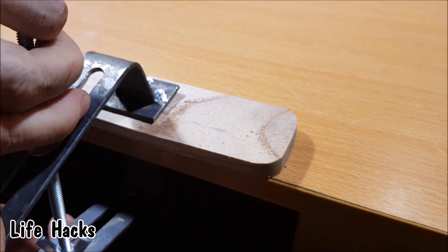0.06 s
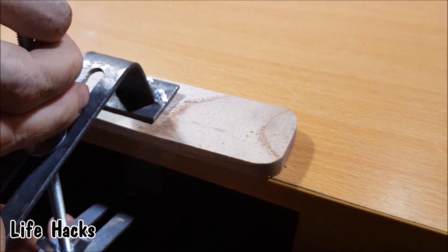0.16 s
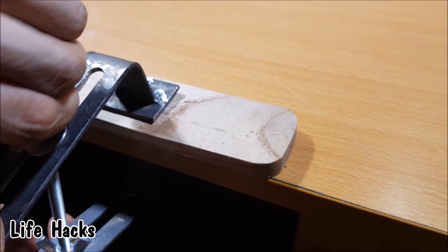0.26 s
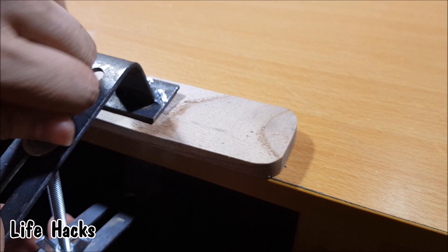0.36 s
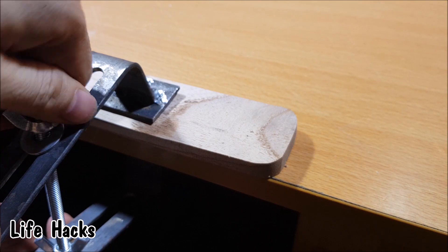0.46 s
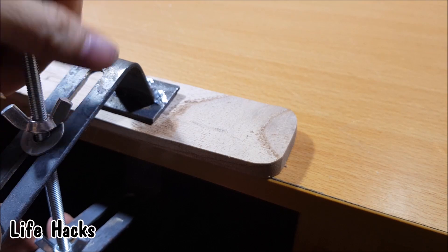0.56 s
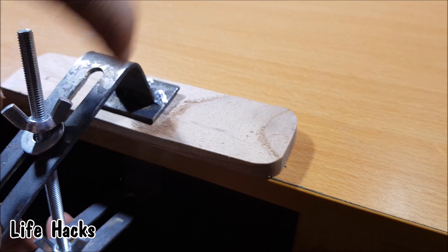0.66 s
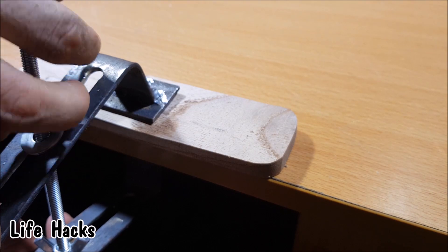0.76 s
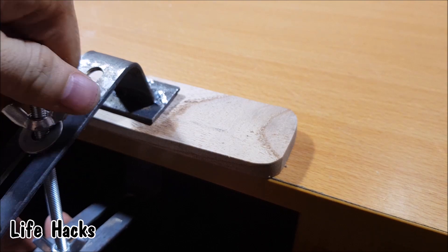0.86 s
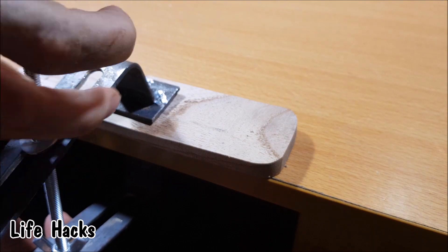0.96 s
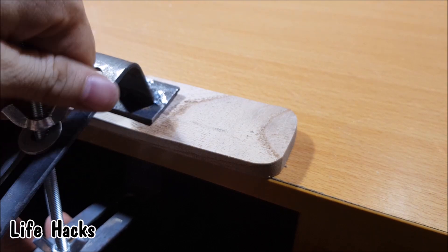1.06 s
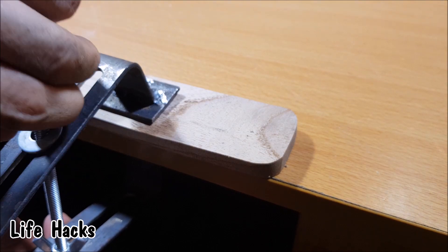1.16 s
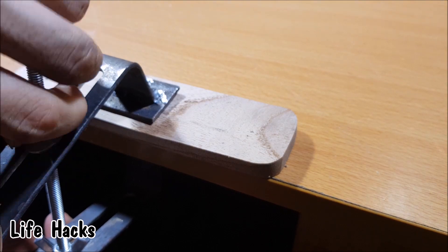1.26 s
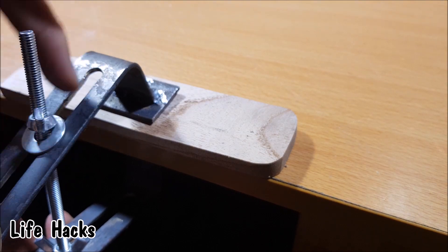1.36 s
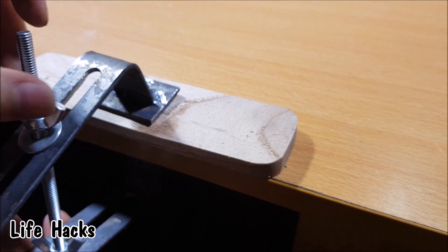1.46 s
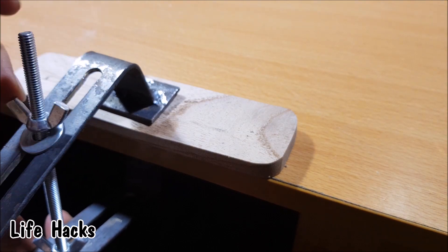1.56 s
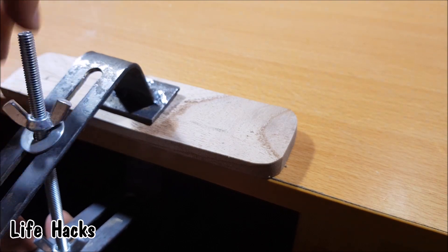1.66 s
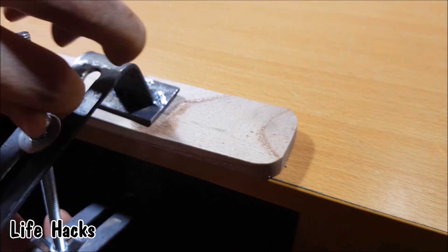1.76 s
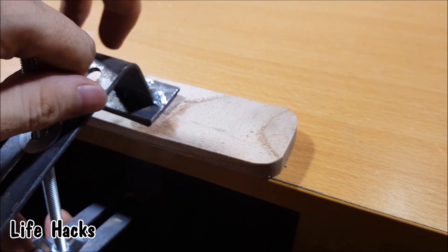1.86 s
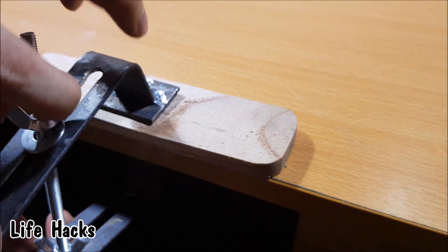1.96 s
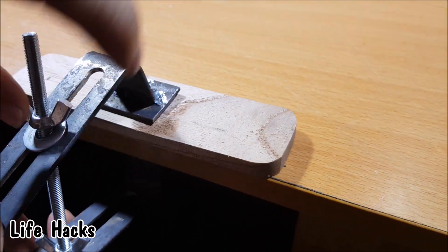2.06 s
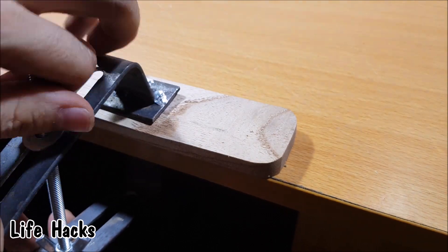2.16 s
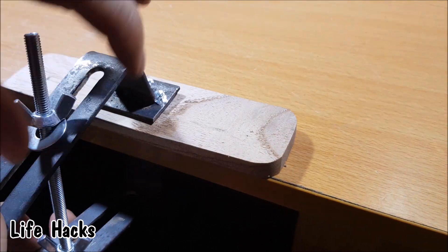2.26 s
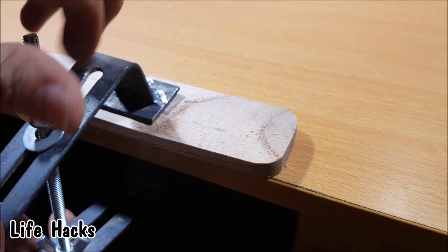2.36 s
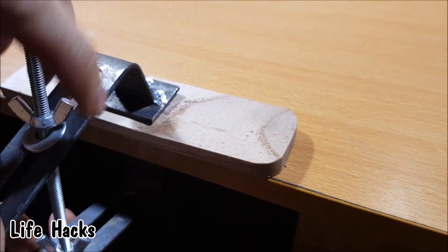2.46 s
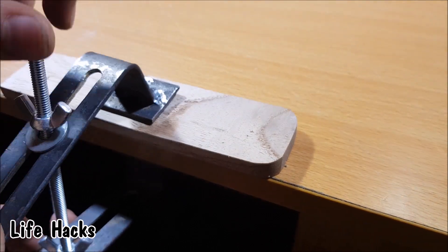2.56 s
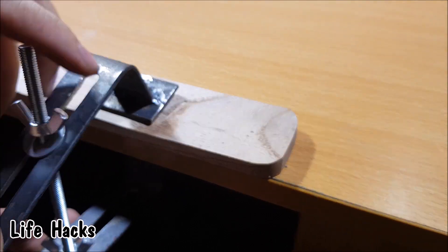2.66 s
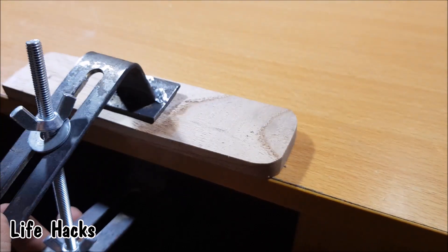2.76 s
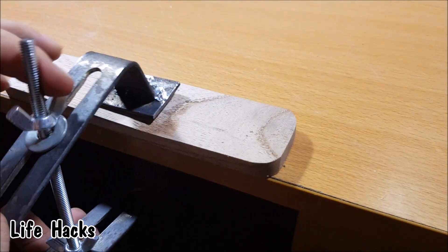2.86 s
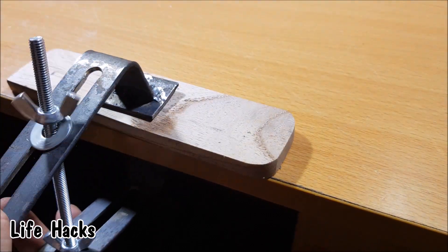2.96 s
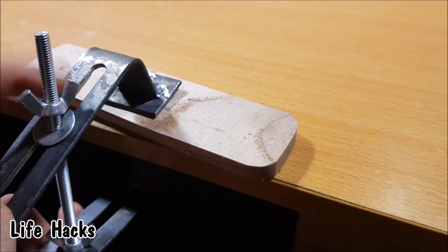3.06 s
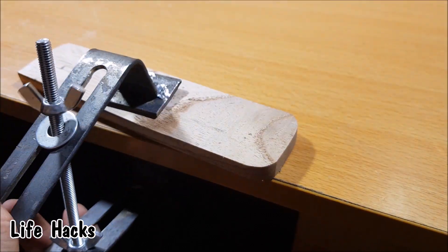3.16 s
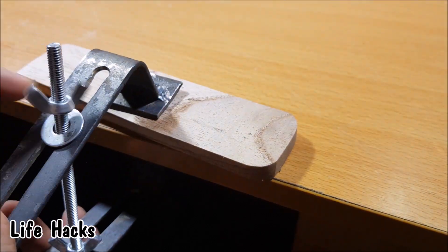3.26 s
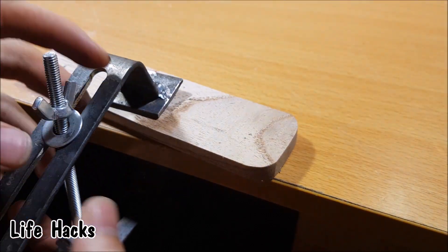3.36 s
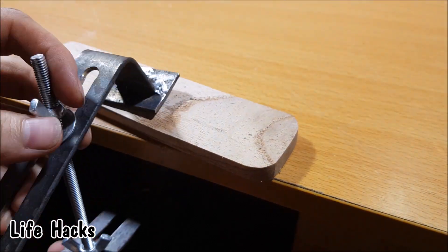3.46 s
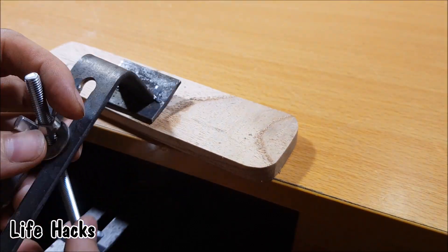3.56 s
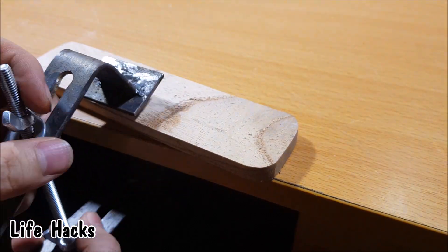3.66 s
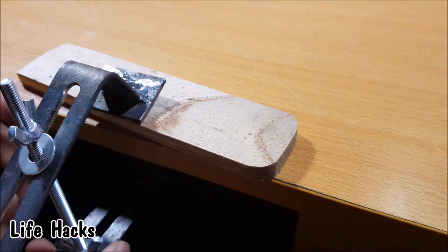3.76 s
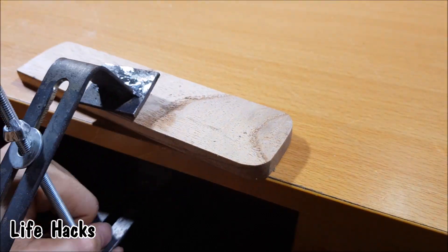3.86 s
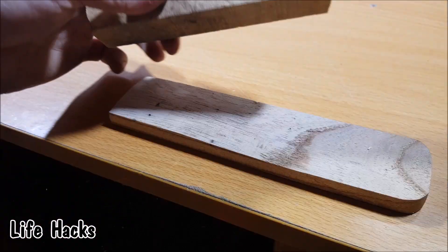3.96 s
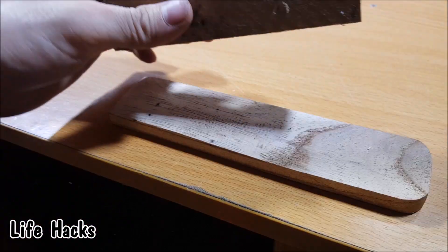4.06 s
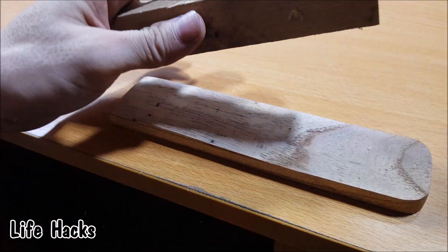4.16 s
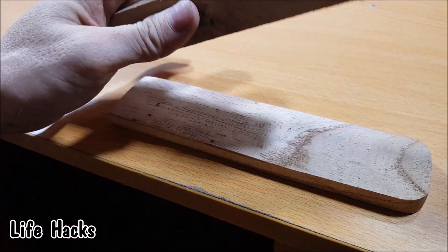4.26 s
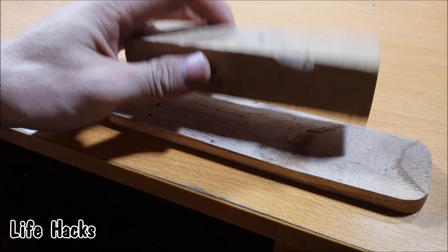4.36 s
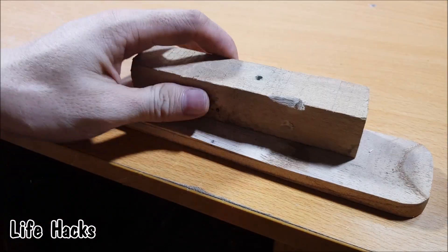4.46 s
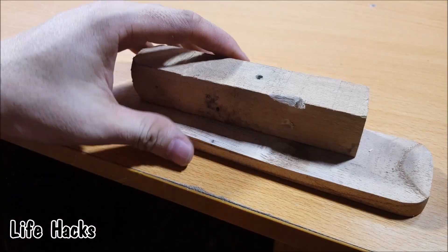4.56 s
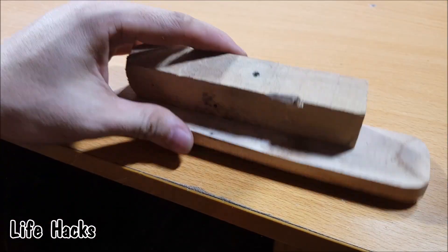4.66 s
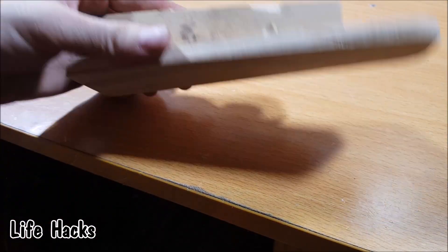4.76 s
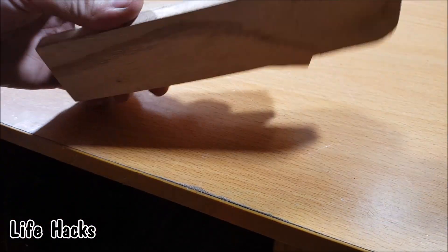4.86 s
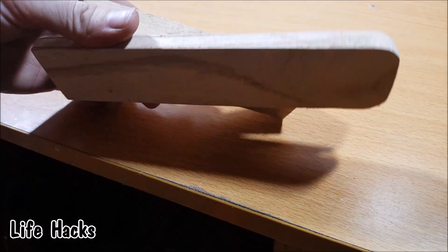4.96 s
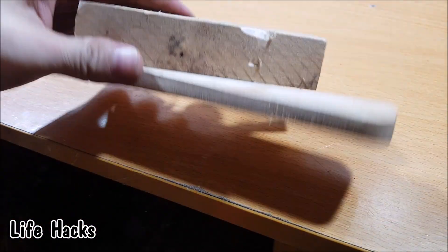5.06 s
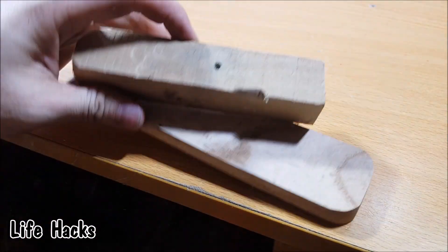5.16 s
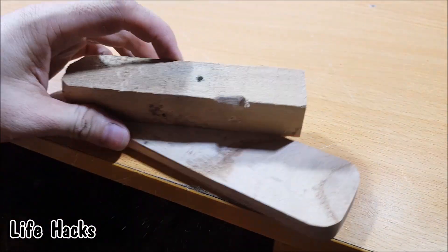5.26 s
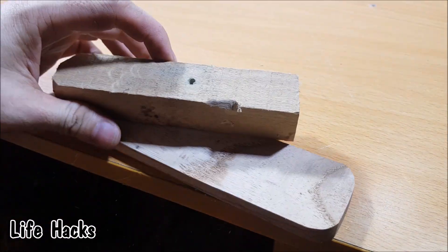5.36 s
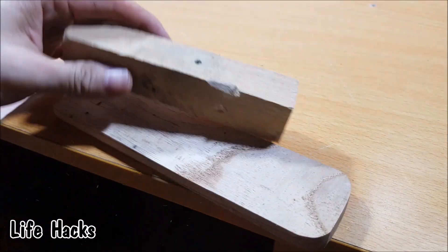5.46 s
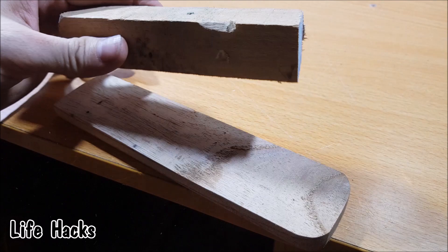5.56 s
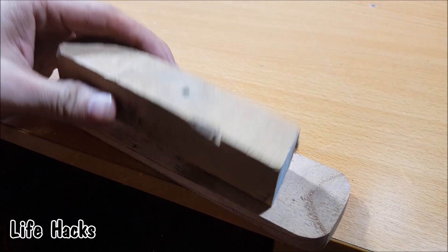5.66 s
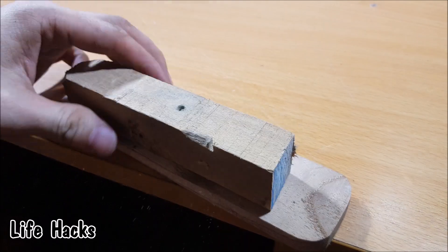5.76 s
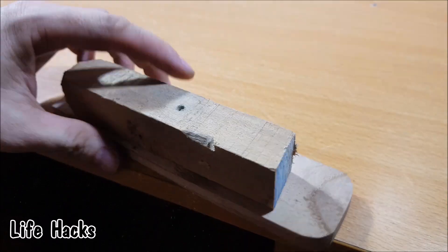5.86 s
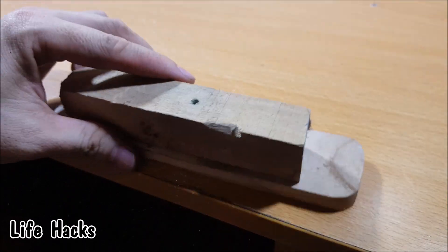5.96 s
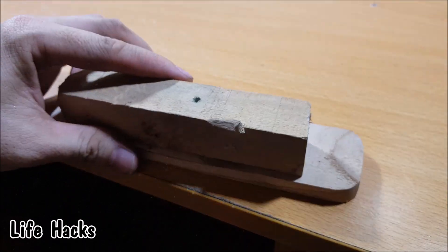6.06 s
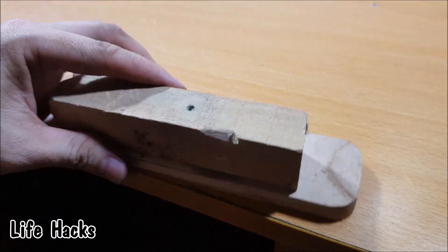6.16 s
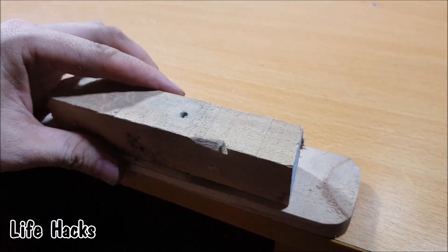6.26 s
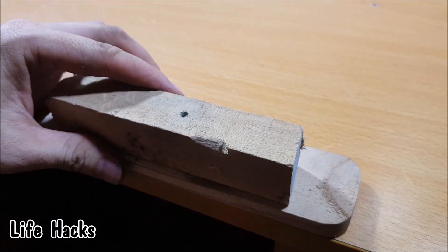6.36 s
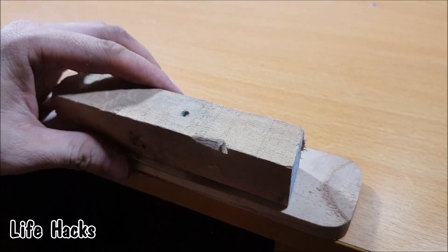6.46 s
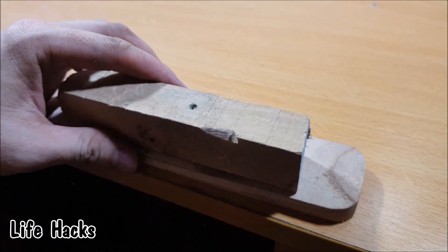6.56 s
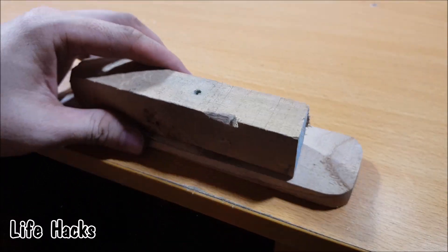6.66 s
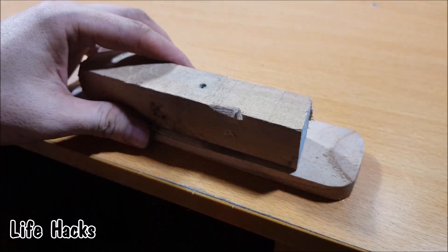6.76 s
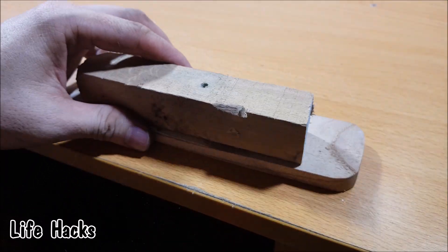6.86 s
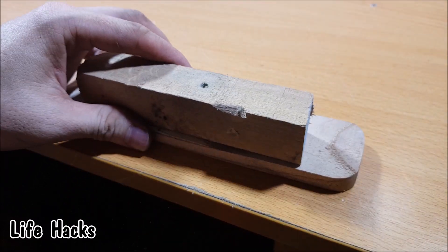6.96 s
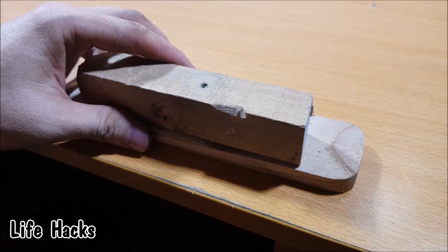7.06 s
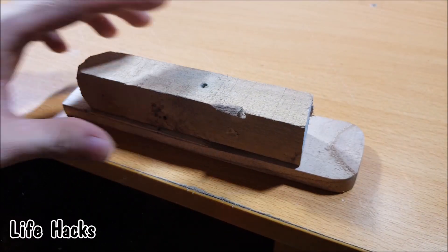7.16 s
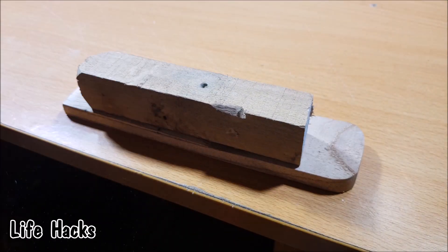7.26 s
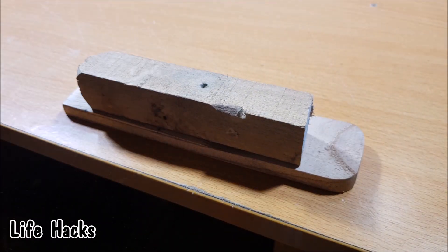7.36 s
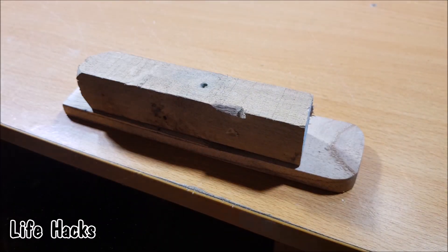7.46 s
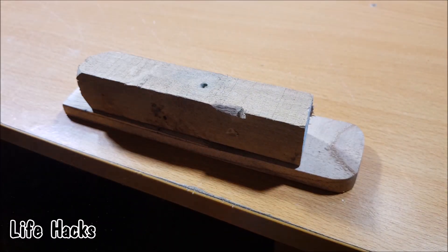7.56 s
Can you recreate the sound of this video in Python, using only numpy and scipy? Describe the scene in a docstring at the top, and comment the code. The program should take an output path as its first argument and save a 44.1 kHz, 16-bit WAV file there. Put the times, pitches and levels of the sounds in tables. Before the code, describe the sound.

Close stereo microphone in a small hard room. Hands rub a steel clamp on a wooden board; one solid metal clank with a table thud and a low drag. Then about three seconds of sped-up, high-pitched clicks, clinks and knocks with swishes and squeaks. It stops abruptly; in near silence a wood block clacks onto the board several times, then faint sliding and rubbing.

```python
"""Small hard room, table edge: hands tighten a steel strap clamp onto a board, then set a wood block on it.
Knocks ring decaying modes of the struck part and the table top, plus a brief crack; noise echoes follow.
Fingers, threads and wood rub, swish, click, squeak and drag as filtered noise, over a steady air noise. The
tightening is played four times too fast: pitches rise and decays shorten."""
import sys
import numpy as np
from scipy import signal
from scipy.io import wavfile
from scipy.ndimage import uniform_filter1d

SR = 44100
rng = np.random.default_rng(int(sys.argv[2]) if len(sys.argv) > 2 else 0)


def transcribe(u):
    """Save the signal u as a 16-bit wav file named by the first command-line argument.

    u: samples, shape (n,) or (channels, n), limited to [-1, 1]; the rate is SR.
    q: integer samples, one column per channel.
    """
    v = np.clip(np.atleast_2d(u).T, -1, 1)
    q = np.round(v * 32767).astype(np.int16)
    wavfile.write(sys.argv[1], SR, q)


N = 335160

SPEED = 4  # of the fast stretch
CUTOFF_HZ = 16300
LOOSE_ABOVE_HZ = 460  # before the speed factor: splits bright from dull, loose from firm

# Body modes, before speed, gain and damping factors: pitch_hz, gain_db, t60_s
TABLE_MODES = [(65, 0.5, 0.22), (86, 1, 0.18), (105.4, 8.5, 0.22), (134.2, 3.5, 0.4), (175, -6, 0.059),
               (226.7, 4, 0.15), (257.9, 1.5, 0.13), (298, -7.5, 0.049), (336.3, -11.5, 0.12),
               (426, -12, 0.41), (543, -10.5, 0.24), (605.5, -13, 0.25)]
CLAMP_MODES = [(191, -4, .12), (243.5, -1, 0.28), (774, -9.5, 0.054), (1830, -0.5, 0.21), (2050, 0, 0.066),
               (2287, 4, 0.075), (2400, -1, 0.096), (2720, 2, 0.028), (3052, 0, .03), (3430, 3.5, 0.032),
               (3620, -13.5, 0.061), (3940, -11, 0.06), (4270, -1.5, 0.04), (6190, -13, 0.016),
               (7930, -1, 0.018)]
BLOCK_MODES = [(696, -3.5, .02), (900, -3.5, 0.02), (1195, -7, 0.06), (1520, -5, 0.02), (1930, 1, 0.027),
               (2136, 3, .025), (2340, -1, 0.02), (2530, -1, 0.018), (2700, -1, .025), (3140, -5.5, 0.029),
               (3372, -4.5, 0.02), (3720, -1.5, 0.044), (4060, -3, 0.033), (4273, -4, 0.03),
               (5660, -4.5, 0.055), (6080, 1, 0.028), (7985, -5, 0.033)]
# Left-right correlation, frequency before the speed factor: freq_hz, correlation (-1 to 1)
LIKENESS = [(60, 0.93), (250, 0.85), (640, 0.49), (1400, -0.37), (4000, -0.046)]


def from_db(db):
    """Amplitude gain of a level in dB."""
    return 10 ** (np.asarray(db) / 20)


def rms_one(x):
    """Scale to rms 1."""
    return x / np.sqrt(np.mean(x ** 2) + 1e-20)


def at_hz(points, hz):
    """Read a (Hz, value) table on a log-frequency axis."""
    table_hz, values = np.array(points)[:, 0], np.array(points)[:, 1]
    return np.interp(np.log(hz), np.log(table_hz), values)


def stereo(mid, side, hz):
    """Mix two independent noises to the left-right correlation at hz."""
    alike = np.clip(at_hz(LIKENESS, hz), -.99, .99)
    return np.sqrt(1 + alike) * mid + np.sqrt(1 - alike) * side * [[1], [-1]]


def banded_noise(size, gain_of_band, speed):
    """Half-octave bands of stereo noise, alike in the bass; gain_of_band(Hz) may vary in time."""
    out = 0
    edges_hz = 25 * 2 ** np.arange(0, 9.6, .5)
    white = rng.standard_normal((2, 2, size))
    for k, (low, high) in enumerate(zip(edges_hz, edges_hz[1:])):
        band_filter = signal.butter(2, [low, high], "band", fs=SR, output="sos")
        mid, side = signal.sosfilt(band_filter, white[k % 2])
        hz = np.sqrt(low * high)
        out = out + gain_of_band(hz) * stereo(mid, side, hz / speed)
    return out


def skin_hiss():
    """Steady noise with the spectrum of skin and thread friction, rms 1."""
    # freq_hz, density_db (relative, per Hz)
    hiss_spectrum = [(880, -20.5), (1500, -7), (2170, -11.5), (2450, -6.5), (4710, -5), (5640, -7.5),
                     (13500, -12.5), (16000, -23.5), (16500, -35)]
    return rms_one(banded_noise(N, lambda hz: from_db(at_hz(hiss_spectrum, hz)), 0.81))


def air_noise():
    """Steady low-weighted background noise at -59 dB rms."""
    # freq_hz, density_db (relative, per Hz)
    air_spectrum = [(15, -53), (25, -31), (53, 3.5), (124, 11.5), (142, -2), (167, -48), (208, -26),
                    (252, -24.5), (358, -2), (389, -43.5), (617, -63.5), (7300, -59), (16500, -52)]
    return from_db(-59) * rms_one(banded_noise(N, lambda hz: from_db(at_hz(air_spectrum, hz)), 1.0))


def friction_on(modes, speed, damping):
    """Friction noise through a body's modes, widened by the touching hand; rms 1."""
    mid, side = rng.standard_normal((2, N))
    out = 0
    for hz, db, t60 in modes:
        radius = from_db(-60 * speed * damping / (t60 * SR))
        angle = 2 * np.pi * min(hz * speed, CUTOFF_HZ) / SR
        poles = [1, -2 * radius * np.cos(angle), radius ** 2]
        ringing = signal.lfilter([1, 0, -1], poles, stereo(mid, side, hz))
        out = out + from_db(db) * np.sqrt(1 - radius) * ringing
    return rms_one(out)


def rubbing(rows, hits, settle_db, body, speed, hiss, damping, table_damping):
    """Hiss, scrape and rumble follow the hands, and swell after each knock while the part settles."""
    settle_t60_s, grain_ms = 0.6 / speed, 10 / speed
    start_s, *levels_db = np.transpose(rows)
    held_db = [np.interp(np.arange(N) / SR, start_s, level, -120, -120) for level in levels_db]

    # decaying power of the bright and dull parts of the knocks
    keep = from_db(-120 / (settle_t60_s * SR))
    settling = {}
    for kind in ("high", "low"):
        split = signal.butter(2, LOOSE_ABOVE_HZ * speed, kind, fs=SR, output="sos")
        power = np.mean(signal.sosfilt(split, hits + 1e-9) ** 2, axis=0)
        settling[kind] = signal.lfilter([1 - keep], [1, -keep], power)

    # uneven friction, 3 dB rms
    slow_noise = uniform_filter1d(rng.standard_normal((2, N)), size=round(grain_ms * SR / 1000))
    grains = from_db(3 * rms_one(slow_noise))
    scrape = rms_one(grains[0] * friction_on(body, speed, damping))
    rumble = rms_one(grains[1] * friction_on(TABLE_MODES, speed, table_damping))

    out = 0
    for hand_db, swell_db, kind, layer in zip(
            held_db, settle_db, ("high", "high", "low"), (hiss, scrape, rumble)):
        power = from_db(hand_db) ** 2 + from_db(swell_db) ** 2 * settling[kind]
        out = out + np.sqrt(power) * layer
    return out


def strokes():
    """Drags, swishes, clicks and squeaks: friction noise in one resonance, setting in quickly and fading."""
    # Dull drags of wood or a hand on the table: start_s, length_s, level_db (before fades), pitch_hz
    drags = [(0.294, 0.31, -37, 193), (0.32, 0.17, -44, 480), (0.742, 0.05, -54, 151),
             (0.822, 0.018, -53, 150), (5.023, 0.07, -56.5, 420), (5.023, 0.032, -64, 750),
             (5.302, 0.1, -42, 147), (5.751, 0.08, -40, 81), (5.946, 0.15, -47, 65),
             (5.987, 0.11, -46.5, 254), (6.03, 0.057, -51, 250), (6.148, 0.19, -53, 75),
             (6.217, 0.18, -52, 274), (6.531, 0.14, -62, 243), (6.669, 0.17, -53, 242),
             (6.695, 0.12, -49.5, 105), (6.7, 0.09, -68, 560), (6.869, 0.16, -63.5, 237),
             (7.002, 0.11, -59.5, 120), (7.238, 0.048, -65, 119.5), (7.352, .06, -61, 120.4),
             (7.487, 0.072, -69, 119)]
    # Broad noise, swishes of skin and wood and short clicks: start_s, length_s, level_db (before fades)
    swishes = [(0.844, 0.076, -43.5), (1.128, 0.16, -42.5), (1.457, 0.12, -52.5), (1.593, 0.43, -63),
               (2.159, 0.014, -47), (2.239, 0.093, -49.5), (2.986, 0.091, -36.5), (3.41, 0.043, -77),
               (3.874, 0.017, -45.5), (4.663, .012, -62), (4.997, .01, -62), (5.034, 0.022, -60),
               (5.275, 0.0093, -47), (5.355, .01, -58), (6.649, 0.18, -60.5), (7.341, 0.13, -64.5),
               (7.513, 0.14, -66.5), (7.58, 0.035, -66)]
    # Narrow squeaks: start_s, length_s, level_db (before fades), pitch_hz, width_hz
    squeaks = [(1.801, 0.043, -35.5, 3220, 630), (1.72, 0.13, -55, 2670, 31), (1.74, .06, -66, 1360, 54),
               (1.978, 0.068, -55, 1136, 70), (1.99, 0.11, -57.5, 2340, 140),
               (2.525, 0.088, -46.5, 2600, 150), (2.89, 0.054, -45, 1580, 110),
               (3.07, 0.054, -46.5, 2360, 130), (4.746, 0.03, -62, 7800, 220),
               (4.779, 0.1, -59.5, 5230, 75), (5.029, 0.026, -62, 3310, 70),
               (5.03, 0.022, -58.5, 5970, 150), (5.03, 0.018, -60, 7760, 200), (6.236, 0.3, -67, 3290, 47),
               (6.24, 0.31, -69, 2620, 140), (6.242, 0.42, -71, 1660, 73), (6.254, 0.35, -65.5, 834, 140),
               (6.26, 0.23, -67, 1204, 54), (6.74, 0.46, -75.5, 1175, 11), (6.683, 0.1, -69.5, 2480, 61),
               (6.77, 0.11, -75, 2400, 44)]
    swish_hz, swish_width_hz = 8100, 8800
    drag_width = 0.17  # share of the pitch
    tone_under_hz = 90  # narrower squeaks are partly a wavering tone
    drag_fade, squeak_fade, swish_fade = 1.2, 0.53, 0.65  # exponents

    out = np.zeros((2, N + SR))
    mid, side = rng.standard_normal((2, N + SR))
    rows = [(*row, swish_hz, swish_width_hz, 0, swish_fade) for row in swishes]
    rows += [(*row, max(1 - row[-1] / tone_under_hz, 0), squeak_fade) for row in squeaks]
    rows += [(*row, row[-1] * drag_width, 0, drag_fade) for row in drags]
    for start_s, length_s, db, hz, width_hz, tone, fade in rows:
        start = round(start_s * SR)
        u = np.arange(round(length_s * SR)) / (length_s * SR)
        part = slice(start, start + len(u))
        edges_hz = np.clip([hz - width_hz / 2, hz + width_hz / 2], 30, CUTOFF_HZ)
        band_filter = signal.butter(1, edges_hz, "band", fs=SR, output="sos")
        band = signal.sosfilt(band_filter, stereo(mid[part], side[part], hz))
        # random-walk phase; the left-right phase offset gives the correlation
        step = 2 * np.pi * hz / SR + np.sqrt(np.pi * width_hz / SR) * side[part]
        offset = np.arccos(np.clip(at_hz(LIKENESS, hz), -.99, .99))
        wavering = np.sin(np.cumsum(step) + [[0], [offset]])
        sound = np.sqrt(1 - tone) * rms_one(band) + np.sqrt(2 * tone) * wavering
        out[:, part] += from_db(db) * sound * np.minimum(u / 0.086, 1) * (1 - u) ** fade
    return out[:, :N]


def knocks(events, reach, body, speed, chatter_ms, table_db, ring_db, crack_db, crack_cycles,
           scatter, rattle, rise, table_scatter, uneven_db):
    """Each knock is a short chatter of contacts that rings table and body modes and a crack of brief modes."""
    left_treble_db, left_treble_hz = 1, 1212  # the left port faces the work and hears knocks brighter
    rattle_ms = 2.4 / speed
    chatter_s = max(chatter_ms, .1) / 1000 / speed
    out = np.zeros((2, N + SR))
    t = np.arange(int(SR * .4 / speed)) / SR

    # table, body, crack
    crack_hz = np.geomspace(300, 16000, num=44)
    n_table, n_body, n_crack = len(TABLE_MODES), len(body), len(crack_hz)
    hz, db, t60 = np.transpose(TABLE_MODES + body)
    spread = np.r_[np.full(n_table, table_scatter), np.full(n_body, scatter), np.full(n_crack, .015)]
    hz = np.r_[hz * speed, crack_hz]
    t60 = np.r_[t60 / speed, crack_cycles / crack_hz]
    db = np.r_[db[:n_table] + table_db, db[n_table:] + ring_db, np.full(n_crack, crack_db)]
    db = db - 99 * (hz > CUTOFF_HZ)

    loose = rattle * (hz > LOOSE_ABOVE_HZ * speed)[:, None]
    unlike = 1 - np.clip(at_hz(LIKENESS, hz / speed), 0, 1)
    reached = np.array([from_db(at_hz(part, hz / speed)) for part in reach])
    treble = hz ** 2 / (hz ** 2 + left_treble_hz ** 2)
    facing = np.float32(from_db(left_treble_db / 2 * treble * [[1], [-1]]))[..., None]
    for start_s, *forces_db, pan_db in events:
        chance = rng.standard_normal((4, len(hz)))
        late = rng.random(len(hz))
        force = np.sqrt(from_db(forces_db) ** 2 @ reached ** 2)
        height = force * from_db(db + uneven_db * chance[0])
        pitch = hz * (1 + spread * chance[1])
        # the two ports see each mode with its own phase, the more so the less alike they are
        phase = np.pi * np.arange(len(hz)) + 0.45 * chance[2]
        phase = phase + 1.114 * unlike * chance[3] * [[1], [-1]]
        # each mode is set off by another contact of the chatter and builds up over a part of it
        age = np.maximum(t - 0.68 * chatter_s * late[:, None], 0)
        build_up = 1 - np.exp(-age / (rise * chatter_s))
        dying = height[:, None] * from_db(-60 * age / t60[:, None]) * build_up
        # the loose part rattles on, shaking the phase of its ringing
        grain_size = max(round(rattle_ms * SR / 1000), 1)
        grain = rms_one(uniform_filter1d(rng.standard_normal(len(t)), size=grain_size))
        shaken = loose * np.sign(chance[1])[:, None] * grain
        angle = 2 * np.pi * pitch[:, None] * age + shaken + phase[..., None]
        sound = np.sum(facing * dying * np.sin(np.float32(angle)), axis=1)
        start = round(start_s * SR)
        out[:, start:start + sound.shape[1]] += from_db([[pan_db / 2], [-pan_db / 2]]) * sound
    return out[:, :N]


def clamp_knocks():
    """Nut, washer and strap strike board and table: the first at true speed, the rest fast."""
    # start_s, edge_click_db, table_thud_db, board_knock_db, strap_clank_db, left_right_db
    hits = [(0.3129, -13.5, -30.5, -33, -23.5, 0.5), (0.8662, -27, -38, -37, -34, 2),
            (0.8969, -31.5, -49, -41.5, -45, 0), (0.9075, -42, -46, -56, -63, -1),
            (1.0545, -49, -54, -47, -62, 0), (1.061, -14.5, -45, -30.5, -27.5, 0.5),
            (1.075, -43, -47.5, -44, -38, 5), (1.0887, -22, -45, -43, -41, 0),
            (1.2215, -18.5, -39.5, -56, -36.5, 0), (1.293, -31, -61, -71, -65, 9),
            (1.3082, -34, -44, -36.5, -39, -4), (1.3262, -29.5, -41, -45, -35, -0.5),
            (1.5205, -40, -38, -39.5, -52, 0.5), (1.6351, -22.5, -37.5, -38, -35.5, 0),
            (1.7061, -44, -53, -56, -51, 0), (1.8035, -12, -38, -57, -29.5, 0.5),
            (1.8999, -48, -46.5, -42, -54, 2), (1.934, -44, -65, -58, -55, 0),
            (1.962, -58, -56, -60, -56, -3), (1.9871, -72, -48, -60, -63, -3),
            (2.0359, -17, -42, -46, -32.5, 0), (2.0555, -40, -53, -48, -38, 0),
            (2.071, -29, -53, -58, -45, -1), (2.163, -40, -41.5, -51, -48, 0),
            (2.1797, -17.5, -45, -35, -29.5, 1), (2.27, -60, -55, -55, -51, -4),
            (2.3326, -37, -42.5, -65, -61, -2), (2.3684, -21, -36, -32, -34.5, -0.5),
            (2.4537, -25, -46, -39, -40, 0), (2.4885, -31, -51, -39.5, -48, -2),
            (2.5244, -22.5, -35.5, -33, -47, 0), (2.5444, -30.5, -67, -62, -39, 0),
            (2.59, -33, -49.5, -40, -43, 1), (2.6354, -45, -57, -74, -68, -2),
            (2.7037, -42.5, -39, -34.5, -49, 0.5), (2.7751, -31, -38, -43, -34.5, -0.5),
            (2.8404, -30.5, -55, -46, -44, 0), (2.9096, -26, -40.5, -35, -38, 1),
            (2.9174, -31, -39.5, -36, -30, -1.5), (2.9538, -27.5, -42, -34.5, -48, 3),
            (2.9906, -22, -41, -55, -34, 3), (3.0547, -27, -43, -45, -39, 3),
            (3.1195, -25.5, -40, -33, -43, 1.5), (3.1536, -29.5, -44, -38, -42.5, 2),
            (3.1911, -31, -43.5, -41, -41.5, 2), (3.246, -23, -37, -29.5, -41, 4),
            (3.2546, -31, -37, -42, -28, -4.5), (3.266, -20.5, -58, -32.5, -35, 3),
            (3.3105, -24, -37.5, -33, -37, 0), (3.3409, -29, -41, -37.5, -37.5, 0),
            (3.4019, -55, -51, -39.5, -45, 0), (3.4198, -46, -42.5, -43, -47.5, -1),
            (3.476, -37, -55, -65, -63, 7), (3.487, -34, -37.5, -45, -55, 0.5),
            (3.5315, -53, -49, -43, -74, 0), (3.5859, -59, -46.5, -54, -77, -1),
            (3.6318, -68, -49.5, -43, -73, -1), (3.6813, -55, -44.5, -49, -79, 0),
            (3.7146, -33, -38, -44, -27, -1), (3.7605, -43, -35.5, -31, -29, 0.5),
            (3.7724, -35.5, -40.5, -38, -37, 0), (3.8417, -57, -46, -36, -49, 0.5),
            (3.8858, -29, -39.5, -34, -35.5, 1.5), (3.9014, -39, -40, -50, -61, 0),
            (3.932, -35, -48, -60, -42, -1), (3.9415, -39, -45, -35.5, -45.5, 0)]
    # One spectrum per force, in that order, before the speed factor: freq_hz, gain_db
    steel_reach = ([(625, -28), (1200, -12), (1750, -8), (3250, 10), (7000, 13), (16000, 28.5)], [(60, -8),
                   (85, -0.5), (110, -2.5), (200, -20.5), (400, -32), (16000, -60.5)], [(110, -25.5),
                   (175, -9.5), (250, -2), (400, -15.5), (900, -27.5), (16000, -53.5)], [(250, -24),
                   (450, 1.5), (800, 7), (1500, -1.5), (16000, -64.5)])
    first = knocks(hits[:1], steel_reach, CLAMP_MODES, 1.0, chatter_ms=21,
                   table_db=-10.5, ring_db=-16.5, crack_db=-19.0, crack_cycles=55.5, scatter=0.013,
                   rattle=1.09, rise=0.044, table_scatter=0.015, uneven_db=3.5)
    fast = knocks(hits[1:], steel_reach, CLAMP_MODES, SPEED, chatter_ms=30,
                  table_db=-4, ring_db=-12.0, crack_db=-2.0, crack_cycles=18.5, scatter=0.0519,
                  rattle=1.4, rise=0.2, table_scatter=0.046, uneven_db=2.5)
    return first, fast


def room(x, speed, wet_db, gap_s):
    """Diffuse echoes: noise dying band by band, after the gap to the first wall."""
    # Before the speed factor: freq_hz, t60_s
    room_t60 = [(100, 0.81), (300, 0.45), (1000, 0.47), (3000, 0.63), (6000, 0.525), (12000, 0.6)]
    # Before the speed factor: freq_hz, gain_db
    room_colour = [(100, -2), (400, 9.5), (1500, 1), (4000, 0), (7000, -7), (12000, -6.5)]
    t = np.arange(SR // speed) / SR

    def band_gain(hz):
        """Exponential decay of one band."""
        fall_db = 60 * speed * t / at_hz(room_t60, hz / speed)
        return from_db(at_hz(room_colour, hz / speed) - fall_db)

    tail = banded_noise(len(t), band_gain, speed)
    tail = tail * np.clip(t * speed / gap_s - .5, 0, 1) * np.sqrt(speed)
    return from_db(wet_db) * signal.fftconvolve(x, tail, axes=1)[:, :N]


def wood_knocks():
    """The wood block touches down and the board is set back on the table; both ring as wood."""
    # Both: start_s, edge_click_db, table_thud_db, part_knock_db, left_right_db
    block_hits = [(4.423, -62, -63, -69, -2), (4.4547, -17.5, -36, -16, 0),
                  (5.7351, -18.5, -24.5, -18.5, 0.5), (5.7616, -13.5, -38, -18, 0),
                  (5.9706, -33, -52, -44, -1), (6.7254, -53, -56.5, -73, 0), (6.8172, -55, -65, -68.5, 0)]
    board_hits = [(5.0166, -62.5, -46, -73, 2), (5.1804, -17.5, -45.5, -15.5, -0.5),
                  (5.2762, -38.5, -45.5, -40.5, -1), (5.363, -47, -63.5, -42, 2),
                  (5.4274, -55, -66.5, -50.5, 2.5)]
    # Board modes, before the gain: pitch_hz, gain_db, t60_s
    board_modes = [(930, -2, 0.12), (1222, 12, 0.051), (1392, 4, .05), (1870, 1.5, 0.063),
                   (2286, -1.5, 0.083), (2310, 0.5, .08), (2763, 3, 0.05), (3150, -4, 0.3),
                   (3174, -7.5, 0.54), (3550, 1.5, 0.058), (4100, 0, 0.04), (5320, 9, 0.03),
                   (5360, 12.5, 0.025), (6600, -13, 0.049), (7760, 14.5, 0.017), (8350, 4, 0.019)]
    # One spectrum per force, in that order, before the speed factor: freq_hz, gain_db
    wood_reach = ([(1000, -30.5), (2300, -17), (4500, 5), (9000, -12), (16000, -34)], [(100, -10),
                  (250, 5.5), (600, 3), (1500, -25), (16000, -62.5)], [(250, -22.5), (1200, -1),
                  (2300, 4.5), (4500, -0.5), (16000, -43)])
    block = knocks(block_hits, wood_reach, BLOCK_MODES, 0.98, chatter_ms=1.31,
                   table_db=-9.5, ring_db=-10, crack_db=-5.0, crack_cycles=17.3, scatter=0.018,
                   rattle=0.77, rise=.03, table_scatter=0.022, uneven_db=1.5)
    board = knocks(board_hits, wood_reach, board_modes, 1, chatter_ms=3.17,
                   table_db=-5.5, ring_db=-14.5, crack_db=-4.5, crack_cycles=14.6, scatter=0.002,
                   rattle=0.35, rise=0.045, table_scatter=0.014, uneven_db=2.5)
    return block + board


def port(x, cut_hz):
    """The microphone loses the deepest bass: second-order high-pass."""
    return signal.sosfilt(signal.butter(2, cut_hz, "high", fs=SR, output="sos"), x)


def scene():
    """True-speed and fast stretches, joined by short fades, with the strokes on top."""
    # Hands before, during and after the fast stretch, one list each:
    # start_s, skin_thread_hiss_db, part_scrape_db, table_rumble_db
    hands_before, hands_fast, hands_after = [
        [(0.0, -59.5, -54.5, -60.5), (0.316, -55.5, -98, -88), (0.358, -58, -53.5, -58), (0.452, -61, -57, -47),
         (0.488, -53.5, -57, -47), (0.624, -52.5, -58.5, -51.5), (0.768, -56, -55, -63.5),
         (0.87, -58, -52, -50)],
        [(0.84, -56, -64, -47), (0.9, -78, -68, -65), (.97, -77, -67, -77), (1.04, -84, -66, -61),
         (1.1, -83, -65, -81), (1.22, -58, -70, -53.5), (1.3, -65, -64, -56), (1.4, -69, -68, -67.5),
         (1.52, -79, -63, -59.5), (1.61, -77, -61.5, -77), (1.68, -89, -55.5, -63), (1.75, -51.5, -53.5, -61),
         (1.9, -60.5, -51, -54), (2.0, -74, -75, -74), (2.13, -67, -56, -57), (2.3, -55, -72, -58.5),
         (2.44, -91, -81, -65), (2.61, -79, -84, -95), (2.68, -78, -65, -61.5), (2.82, -97, -69, -67.5),
         (3.0, -43, -75, -42), (3.15, -55.5, -64, -66), (3.29, -74, -63, -52.5), (3.38, -91, -71, -60),
         (3.49, -52.5, -59, -81), (3.56, -73, -64.5, -88), (3.69, -83, -67, -61), (3.83, -97, -68, -56),
         (3.95, -87, -89, -52), (4.0, -86, -90, -77)],
        [(3.97, -75.5, -91, -81), (4.18, -85.5, -96, -83), (4.47, -74.5, -88.5, -72), (4.62, -74, -56, -57.5),
         (4.87, -67, -66, -64.5), (5.05, -71.5, -94, -71.5), (5.22, -79.5, -82, -65), (5.35, -78, -56, -50),
         (5.54, -73.5, -72, -61.5), (5.78, -75.5, -83, -72), (5.91, -62, -57, -67), (6.06, -63, -65, -55.5),
         (6.17, -78, -101, -59.5), (6.27, -75, -71, -61), (6.39, -83, -70, -65.5), (6.58, -73.5, -80, -67.5),
         (6.67, -67.5, -66, -59), (6.96, -79, -92.5, -69), (7.6, -72, -73, -64.5)],
    ]
    # settling against the knock: hiss and scrape to its bright part, rumble to its dull part
    steel_settle_db, wood_settle_db = (-13.5, -18, -16.5), (-32.5, -23.5, -10.5)
    fast_start_s, fast_end_s, fade_s = .855, 3.985, 0.013

    t = np.arange(N) / SR
    fast = np.clip(np.minimum(t - fast_start_s, fast_end_s - t) / fade_s + .5, 0, 1)
    hiss = skin_hiss()
    steel, fast_hits = clamp_knocks()
    wood = wood_knocks()

    slow_hits = steel + wood
    slow = port(slow_hits + room(slow_hits, 1.0, wet_db=-41.5, gap_s=0.0047), cut_hz=19.24)
    slow += air_noise()
    slow += rubbing(hands_before, steel, steel_settle_db, CLAMP_MODES, 0.94, hiss,
                    damping=5.6, table_damping=2.9)
    slow += rubbing(hands_after, wood, wood_settle_db, BLOCK_MODES, 0.93, hiss,
                    damping=3.0, table_damping=0.75)

    quick = fast_hits + room(fast_hits, SPEED, wet_db=-38.5, gap_s=0.015)
    quick += rubbing(hands_fast, fast_hits, steel_settle_db, TABLE_MODES[7:] + CLAMP_MODES, SPEED, hiss,
                     damping=8.5, table_damping=1.4)
    quick = port(quick, cut_hz=104)
    return np.sqrt(1 - fast) * slow + np.sqrt(fast) * quick + strokes()


def record(dry):
    """Cut the top steeply: 70 dB down from 800 Hz above the cutoff."""
    return signal.sosfilt(signal.cheby2(14, 70, CUTOFF_HZ + 800, fs=SR, output="sos"), dry)


dry = scene()
out = record(dry)
transcribe(out)
```